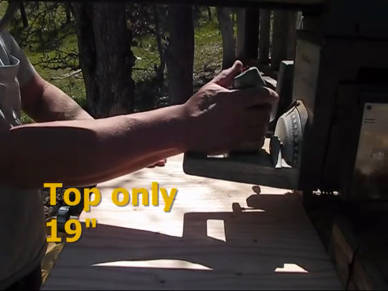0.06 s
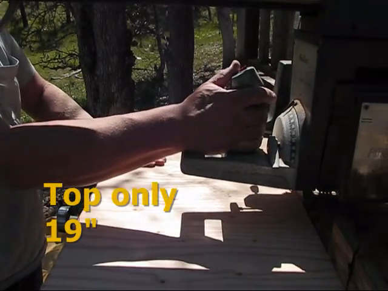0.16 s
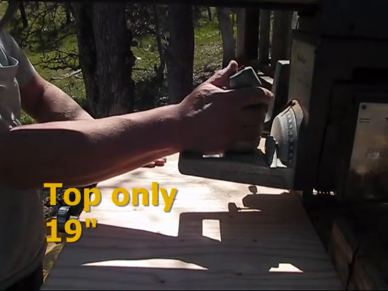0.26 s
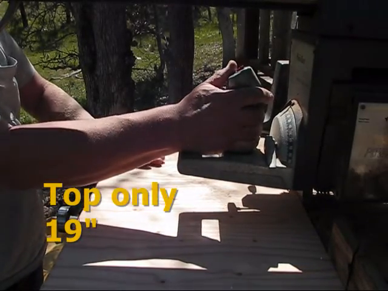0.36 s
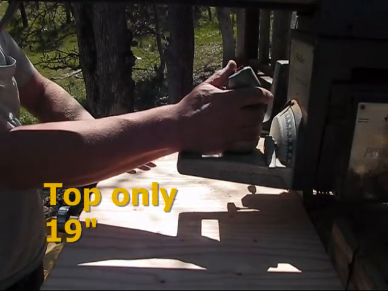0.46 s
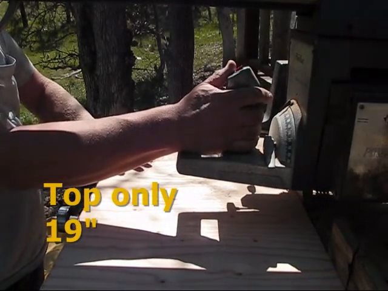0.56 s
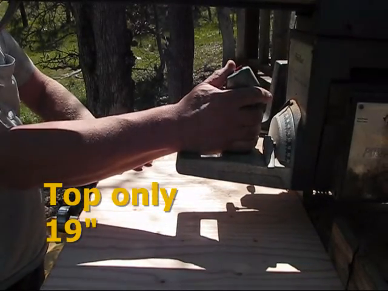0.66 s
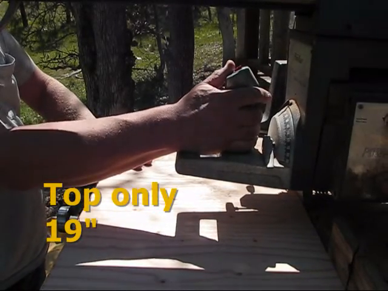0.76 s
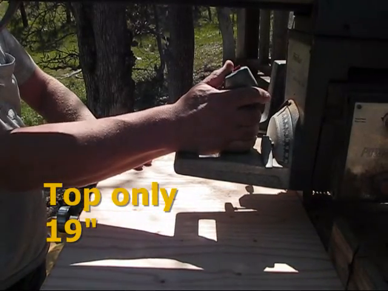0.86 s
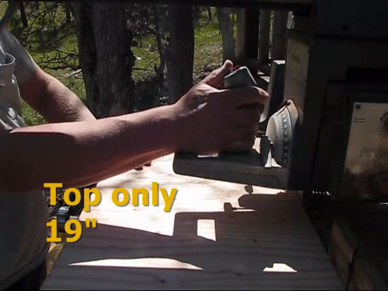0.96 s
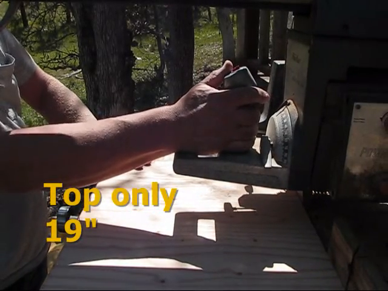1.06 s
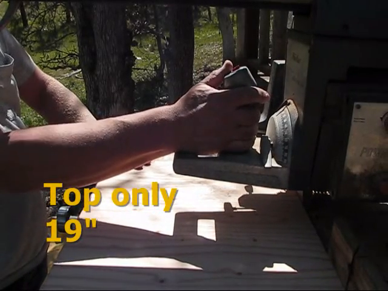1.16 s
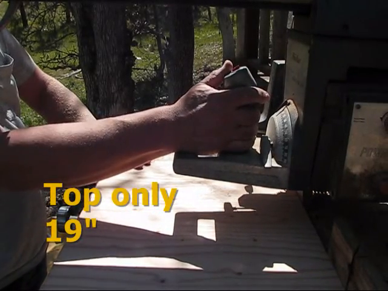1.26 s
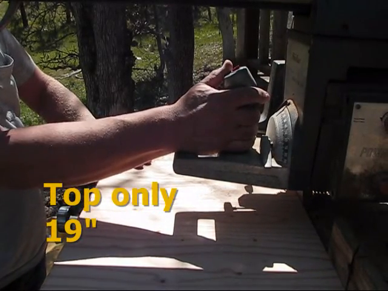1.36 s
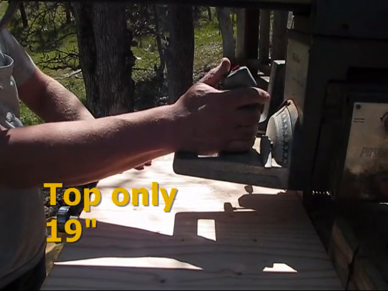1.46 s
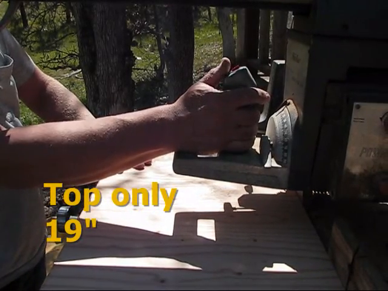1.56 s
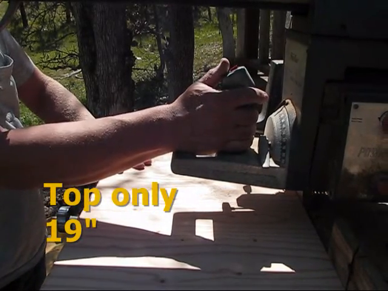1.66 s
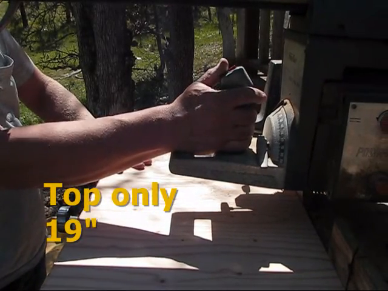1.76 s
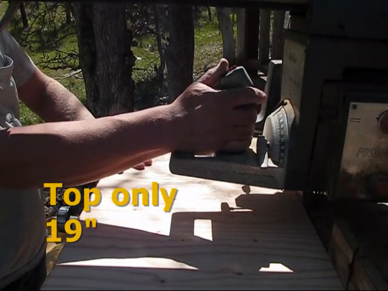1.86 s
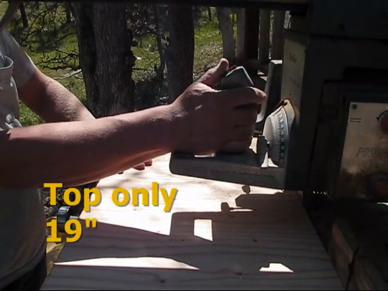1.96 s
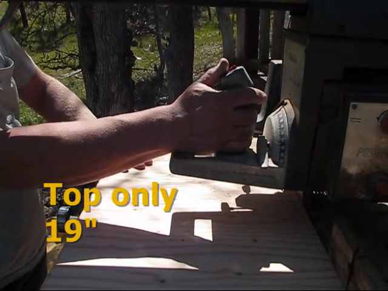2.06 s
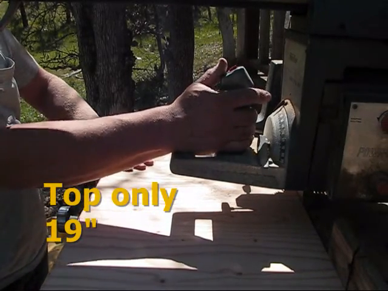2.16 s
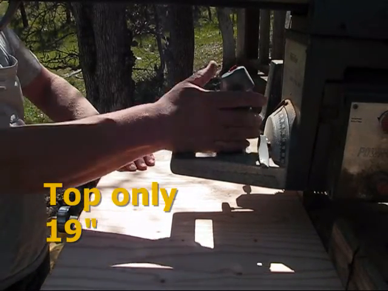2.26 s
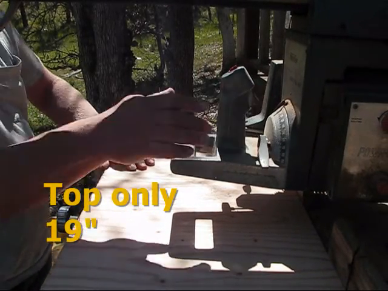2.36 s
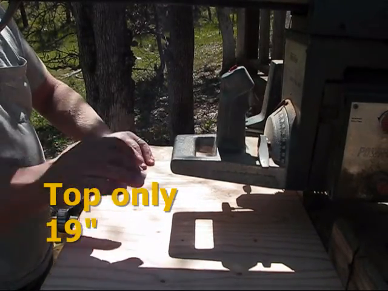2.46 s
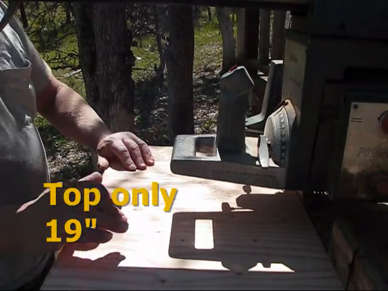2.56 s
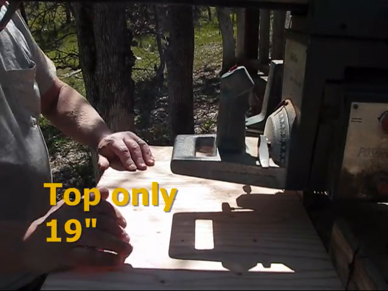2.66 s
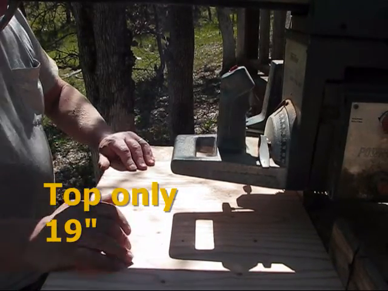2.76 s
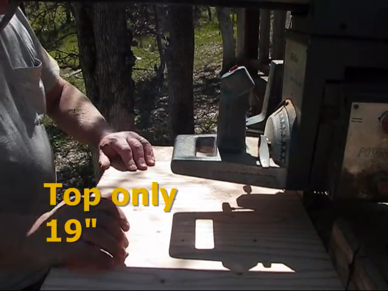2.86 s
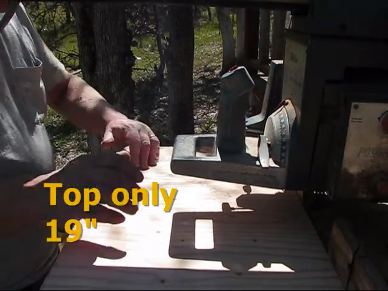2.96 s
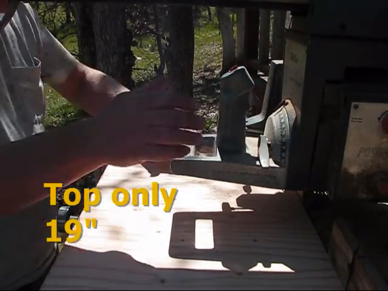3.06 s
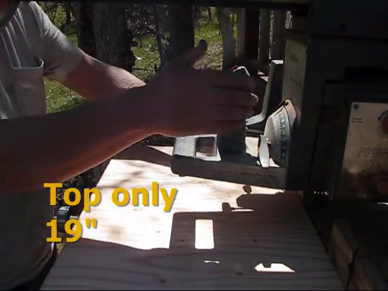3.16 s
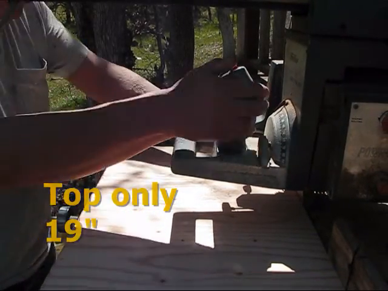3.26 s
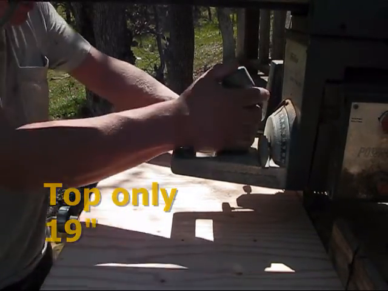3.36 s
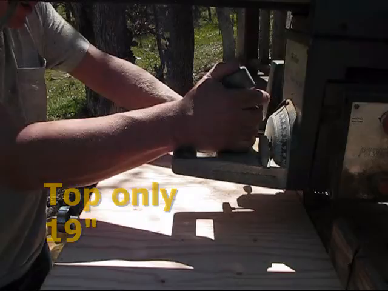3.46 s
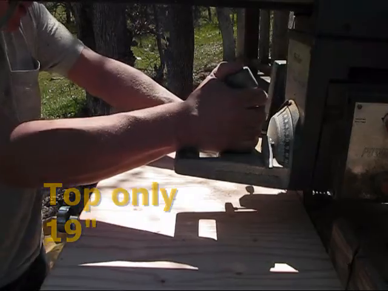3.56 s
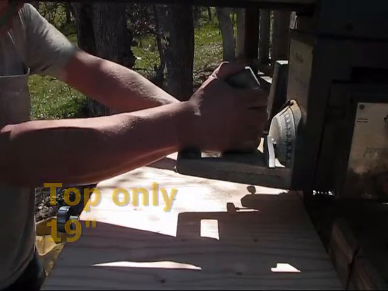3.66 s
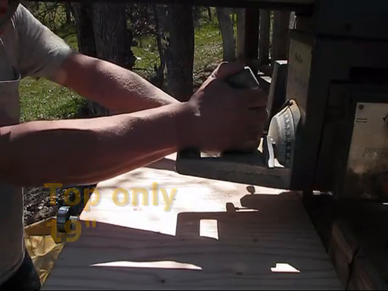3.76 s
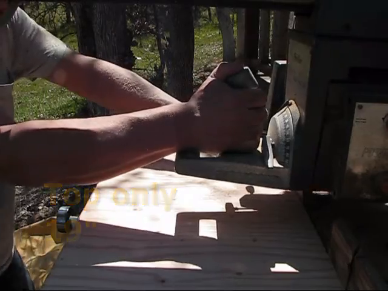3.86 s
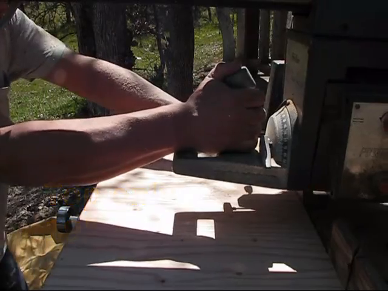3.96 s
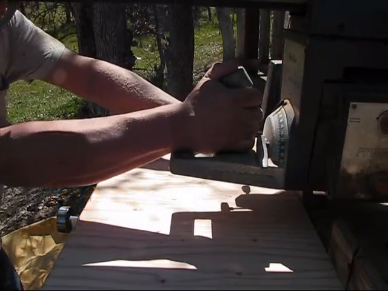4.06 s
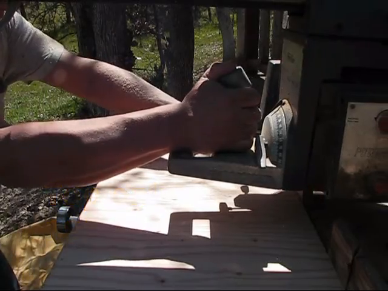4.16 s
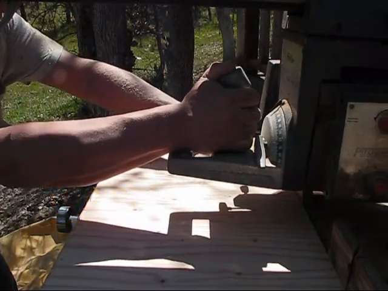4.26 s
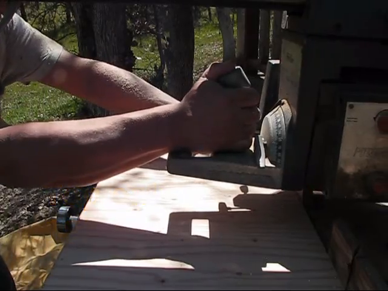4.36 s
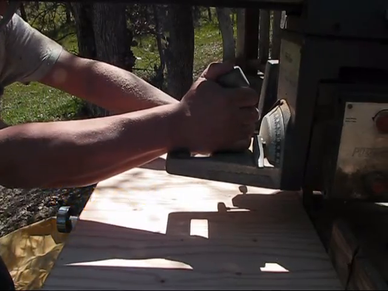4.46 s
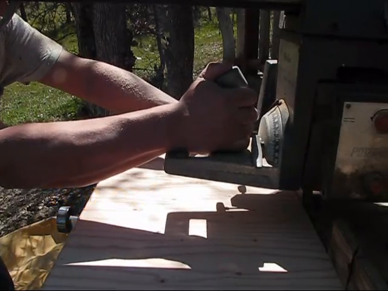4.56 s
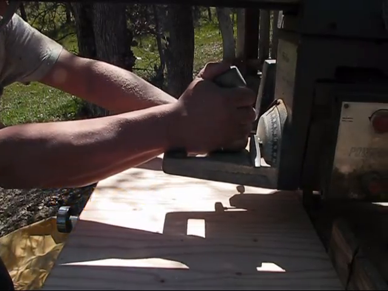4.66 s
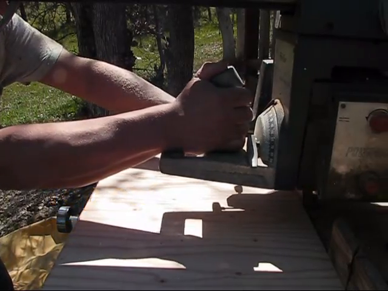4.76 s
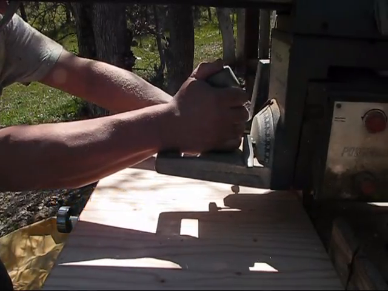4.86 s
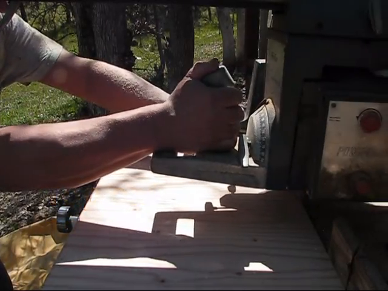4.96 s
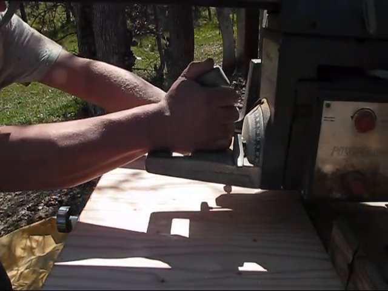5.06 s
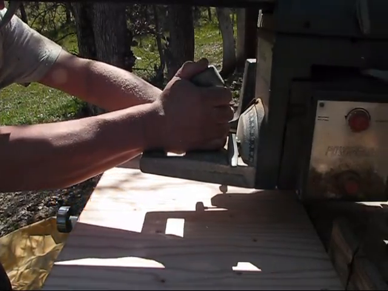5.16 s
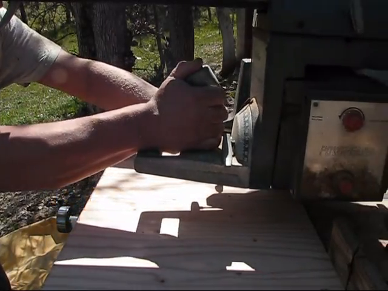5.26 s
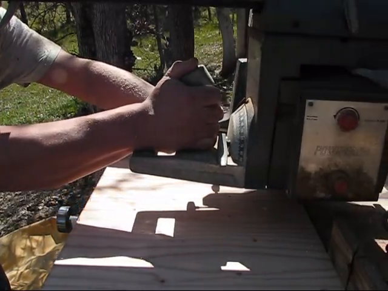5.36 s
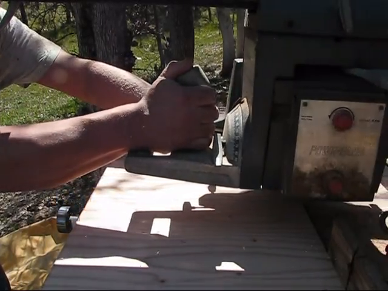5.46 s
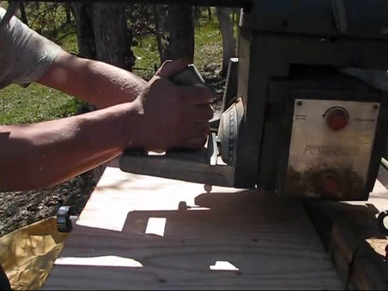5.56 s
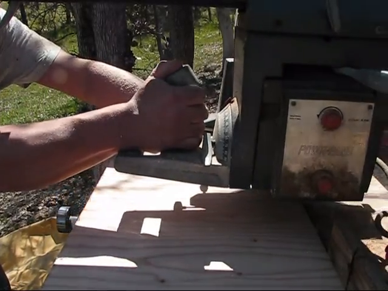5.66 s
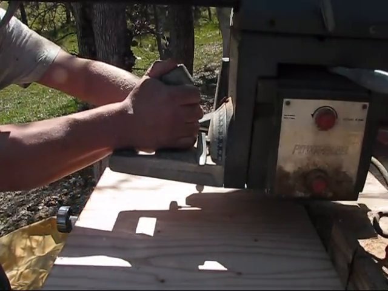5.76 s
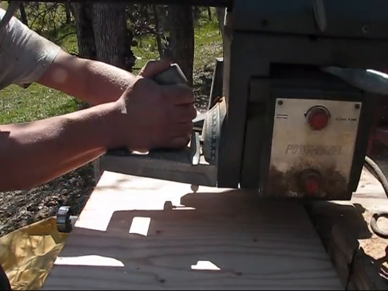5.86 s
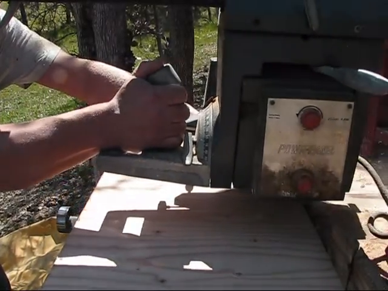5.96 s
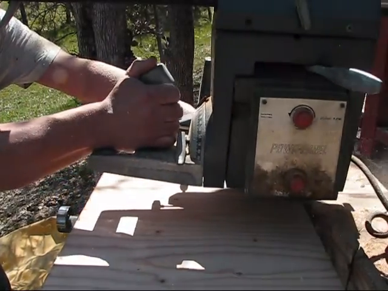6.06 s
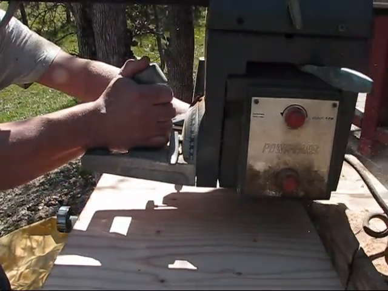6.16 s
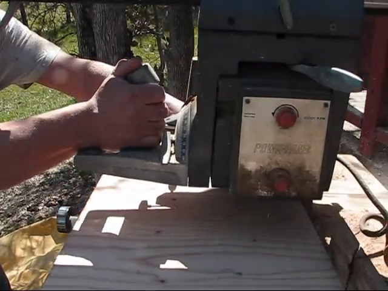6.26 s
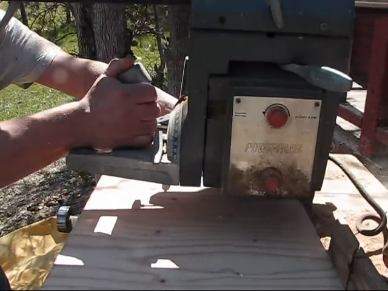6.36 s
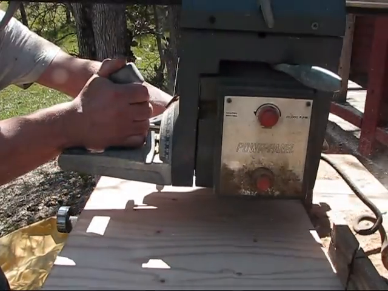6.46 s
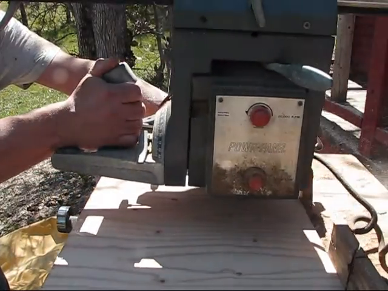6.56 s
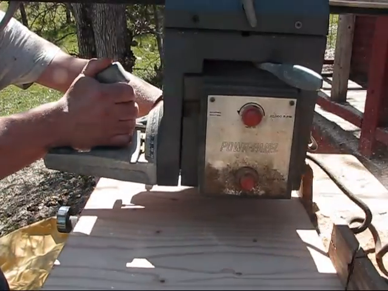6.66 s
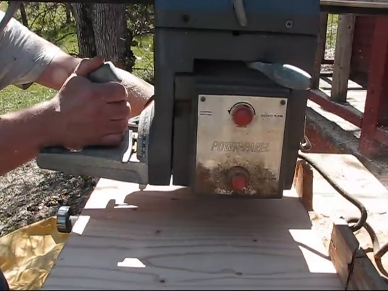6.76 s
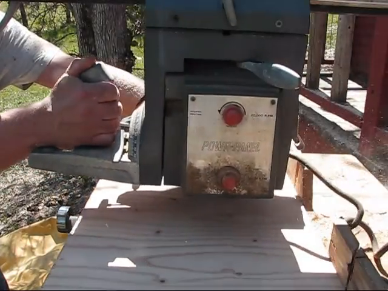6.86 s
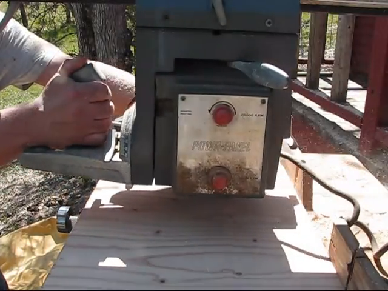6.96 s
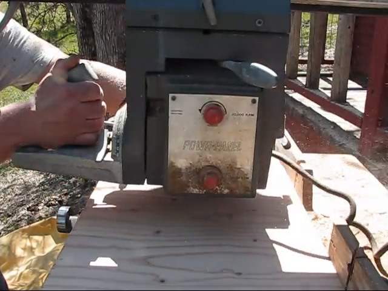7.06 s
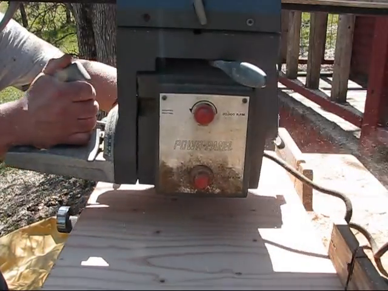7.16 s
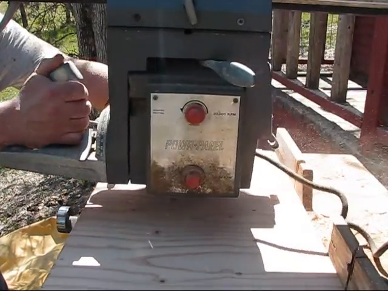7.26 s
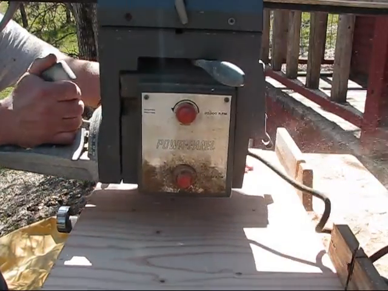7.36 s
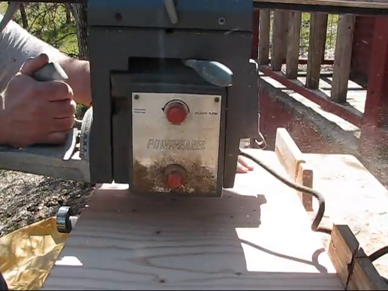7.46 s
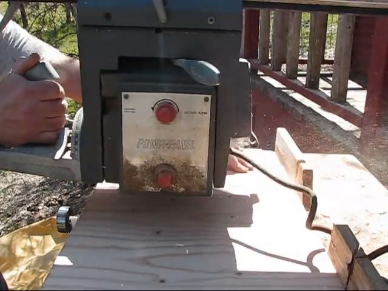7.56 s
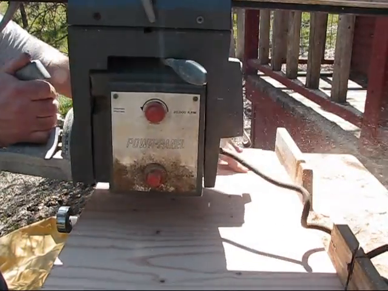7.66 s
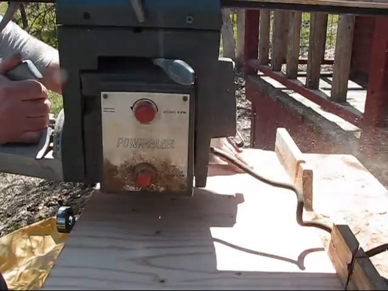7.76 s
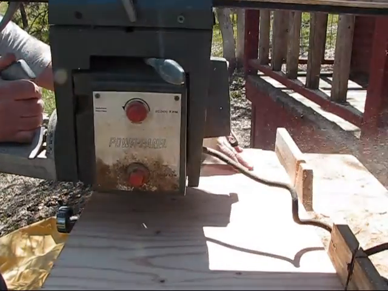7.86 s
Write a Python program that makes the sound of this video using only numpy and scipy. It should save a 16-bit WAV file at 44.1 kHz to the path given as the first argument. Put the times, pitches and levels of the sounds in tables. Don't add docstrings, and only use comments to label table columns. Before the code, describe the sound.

A close stereo microphone in a yard picks up a brief board slide, light knocks, skin rubbing, tiny squeaks and low wind buffets. Then a very loud clack and jolt; a saw motor clatters up with ringing guard pings and a rising whine. The blade grazes the wood, enters, and grinds steadily with hissing dust and wavering metallic singing, sagging slightly at the end.

```python
import sys
import numpy as np
from scipy import signal
from scipy.fft import rfft, irfft, next_fast_len
from scipy.io import wavfile
from scipy.ndimage import uniform_filter1d, map_coordinates

SR = 44100
rng = np.random.default_rng(int(sys.argv[2]) if len(sys.argv) > 2 else 0)


def put_to_file(sound):
    columns = np.atleast_2d(sound).T
    safe = np.clip(columns, -1, 1)
    whole_steps = np.round(safe * 32767)
    wavfile.write(sys.argv[1], SR, whole_steps.astype(np.int16))


def volts_from_db(level):
    exponent = np.asarray(level, float) / 20
    return 10 ** exponent


N = 348390
T = np.arange(N) / SR
COARSE_T = T[::64]
SIZE = next_fast_len(N + SR // 4)
HZ = np.arange(SIZE // 2 + 1) * SR / SIZE + 1e-3
TEETH = 20
START = round(3.82 * SR)
GUARD_HZ, GUARD_WIDTH_HZ = 2790, 60


def rms_one(x):
    return x / np.sqrt(np.mean(x ** 2) + 1e-20)


def in_time(rows):
    s, *columns = np.transpose(rows)
    return [np.interp(T, s, column) for column in columns]


def at_hz(points):
    hz, value = np.transpose(points)
    return np.interp(np.log(HZ), np.log(hz), value)


def through(x, response):
    return irfft(rfft(x, SIZE) * response, SIZE)[..., :N]


def drift(rate):
    knots = rng.standard_normal(800)
    curve = map_coordinates(knots, [COARSE_T * rate * 2], order=2)
    return rms_one(np.interp(T, COARSE_T, curve))


def swells(s, rise, fall, db):
    late = T[::64, None] - s
    length = np.where(late < 0, rise, fall)
    return np.interp(T, COARSE_T, volts_from_db(db - 12 * (late / length) ** 2).sum(axis=1))


def body(modes, spectrum, between_db):
    power = np.tile(volts_from_db(2 * (at_hz(spectrum) + between_db)), (2, 1))
    tilt_db = 1.5 * rng.standard_normal((len(modes), 2, 1))
    for (hz, width, db), tilt in zip(modes, tilt_db):
        detuning = (HZ / hz - hz / HZ) * hz / width
        power += volts_from_db(2 * (db + tilt)) / (1 + detuning ** 2) ** 1.5
    return np.sqrt(power)


def grains(per_s, spread_db):
    sizes = volts_from_db(spread_db * np.minimum(rng.exponential(1, (2, N)), 5)) * rng.standard_normal((2, N))
    return sizes * (rng.random((2, N)) < per_s / SR)


def coloured(pair, gain, likeness):
    mid, side = rfft(pair, SIZE)
    alike = np.clip(at_hz(likeness), 0, 1)
    ears = np.sqrt(1 + alike) * mid + np.sqrt(1 - alike) * side * [[1], [-1]]
    return rms_one(irfft(ears * gain, SIZE)[:, :N])


def panned(db):
    return volts_from_db(np.array([db / 2, -db / 2])).reshape(2, -1)


def two_pole(x, hz, width):
    r = np.exp(-np.pi * width / SR)
    return signal.lfilter([1, 0, -1], [1, -2 * r * np.cos(2 * np.pi * hz / SR), r * r], x)


def resonance(x, hz, width):
    return rms_one(two_pole(x + 1e-18, hz, width))


def burst(s, db, hz, width, t60):
    k = np.arange(9000)
    noise = rng.standard_normal((3, len(k))) * volts_from_db(-60 * k / SR / t60)
    noise[0, 0] += 3
    ring = two_pole(noise[0] + .5 * noise[1:], hz, width)
    out, at = np.zeros((2, N)), round(s * SR)
    out[:, at:at + len(k)] = volts_from_db(db) * ring / np.abs(ring).max()
    return out


# pitch_hz, level_db_per_hz
YARD_COLOUR = [(59, -19), (100, -0.5), (244, -1), (295, 0), (335, 0), (991, 2.5), (1610, -5.5), (2580, -14),
               (8110, -17), (12100, -19.5), (16000, -32)]
# pitch_hz, left_right_likeness
YARD_LIKENESS = [(60, 0.38), (180, 1), (550, 0.9), (1650, 0.66), (4970, 0.061), (15000, 0.03)]


def far_field():
    noise = coloured(rng.standard_normal((2, N)), volts_from_db(at_hz(YARD_COLOUR)), YARD_LIKENESS)
    return volts_from_db(-50 + 1.0 * drift(3.186)) * noise


# pitch_hz, level_db
HUM = [(96.9, -59), (290.7, -62), (7854, -75)]


def hum():
    return sum(volts_from_db(db - 1.0 + 0.51 * drift(5.0)) * np.sin(2 * np.pi * hz * T) for hz, db in HUM)


# peak_s, half_length_s, level_db
GUSTS = [(.75, 0.22, -54), (2.003, 0.12, -55), (2.353, 0.12, -52), (2.932, 0.11, -49.5), (3.6, 0.31, -57),
         (5.15, 0.27, -57), (6.12, 0.2, -58), (6.45, .15, -63), (6.8, .3, -70), (7.15, .25, -58),
         (7.846, 0.21, -54)]
# pitch_hz, level_db_per_hz
GUST_COLOUR = [(12, -35), (20, -2.5), (91, 1.5), (182, -8.5), (259, -38), (277, -11), (300, -7.5),
               (390, -54), (660, -120)]
# pitch_hz, left_right_likeness
NEAR_LIKENESS = [(60, 0.21), (180, 0.42), (550, 0.47), (1650, 0.64), (4970, 0.51), (15000, 0.045)]


def wind(ducked):
    s, half, db = np.transpose(GUSTS)
    blowing = ducked * volts_from_db(-61) + swells(s, half, half, db)
    return coloured(rng.standard_normal((2, N)), volts_from_db(at_hz(GUST_COLOUR)), NEAR_LIKENESS) * blowing


# start_s, level_db
STOP_TOUCHES = [(1.04, -60), (1.875, -56)]
# pitch_hz, level_db, t60_s
STOP_MODES = [(2840, -7, .9), (4264, 0, .9), (5430, -5, .5)]


def metal_stop():
    out = np.zeros(N)
    for s, db in STOP_TOUCHES:
        late = np.maximum(T - s, 0)
        for hz, own_db, t60 in STOP_MODES:
            out += volts_from_db(db + own_db - 60 * late / t60) * np.sin(2 * np.pi * hz * late)
    return out


# start_s, end_s, pitch_hz, level_db
SQUEAKS = [(1.1, 1.14, 2040, -53), (3.28, 3.295, 1750, -44), (3.308, 3.365, 2430, -43),
           (3.31, 3.36, 4250, -52), (3.415, 3.44, 1445, -39)]


def squeaks():
    out = np.zeros(N)
    for on, off, hz, db in SQUEAKS:
        edges = np.clip(np.minimum(T - on, off - T) / 0.0034, 0, 1)
        out += volts_from_db(db - 3.5 + 2 * drift(40)) * edges * np.sin(2 * np.pi * hz * T)
    return out


def yard():
    ducked = volts_from_db(np.interp(T, [3.82, 4.2], [0, -26]))
    return ducked * (far_field() + hum() + metal_stop() + squeaks()) + wind(ducked)


# peak_s, rise_s, fall_s, board_slide_db, skin_and_cloth_scuff_db
HANDS = [(.07, 0.24, 0.18, -29, -32.5), (.36, 0.12, 0.094, -43, -47.5), (.65, 0.069, 0.16, -57, -60),
         (.51, 0.028, 0.034, -64, -53), (.8, 0.032, 0.046, -59, -50), (.93, 0.056, 0.041, -52, -51),
         (1.05, 0.085, 0.072, -45, -48), (1.21, 0.065, 0.083, -56, -67), (1.55, 0.85, 0.15, -60, -83),
         (1.85, 0.11, 0.067, -40.5, -46), (2.16, 0.033, .06, -70, -48), (2.25, 0.046, 0.027, -63, -44.5),
         (2.4, 0.097, 0.063, -59, -47.5), (2.55, 0.08, 0.027, -75, -60), (2.8, .05, 0.062, -76, -49.5),
         (2.92, 0.033, 0.015, -66, -53), (3.03, 0.013, 0.02, -60, -39), (3.06, 0.016, 0.025, -64, -44),
         (3.093, 0.0076, 0.0088, -61, -37), (3.13, 0.019, .02, -65, -46),
         (3.153, 0.011, 0.0091, -48, -31.5), (3.315, 0.011, 0.056, -73, -45),
         (3.368, 0.011, 0.021, -42, -33), (3.45, 0.038, 0.075, -51, -40.5), (3.64, 0.042, 0.026, -43, -43),
         (3.71, 0.054, 0.074, -34.5, -41.5)]
# pitch_hz, level_db_per_hz
SLIDE = [(88, -57), (150, -18), (244, -19.5), (368, -8), (578, -7.5), (805, -4.5), (1060, -0.5),
         (1940, -10.5), (9440, -36), (16000, -60)]
# pitch_hz, width_hz, level_db
BOARD_MODES = [(834, 100, 0), (1070, 51, -2), (1580, 110, -3), (2180, 73, -8), (2820, 63, -9),
               (3430, 110, -12), (4600, 85, -12), (8110, 170, -17)]
# pitch_hz, level_db_per_hz
SCUFF = [(710, -44), (1200, -15), (1460, 7.5), (2000, 2), (2380, 5), (2620, 5.5), (10000, 2), (12300, 1),
         (16000, -20)]
# pitch_hz, width_hz, level_db
LOOSE_MODES = [(4570, 670, 3.5), (2870, 270, 1)]
# start_s, peak_db, pitch_hz, t60_s
KNOCKS = [(1.1947, -27.5, 4090, 0.018), (1.2025, -35, 1500, .03), (1.2365, -26, 4800, 0.024),
          (1.4257, -47, 4960, 0.02), (2.2257, -35, 2760, 0.02), (2.2694, -33, 3090, 0.022),
          (2.8225, -34, 3170, 0.03), (3.019, -36, 2800, 0.03), (3.157, -27, 4000, 0.02),
          (3.3615, -25, 4920, 0.02), (3.384, -33, 5000, .015), (3.442, -33, 4800, .04),
          (3.697, -27, 3500, .025), (3.7072, -15, 4500, 0.018)]


def hands():
    s, rise, fall, slide_db, scuff_db = np.transpose(HANDS)
    slide = coloured(grains(6000, spread_db=-1.5), body(BOARD_MODES, SLIDE, between_db=-1.5), YARD_LIKENESS)
    scuff = coloured(grains(20000, spread_db=1.5), body(LOOSE_MODES, SCUFF, between_db=0), NEAR_LIKENESS)
    sliding = volts_from_db(-48 - 5.2 * T) + swells(s, rise, fall, slide_db)
    scuffing = volts_from_db(-65.5) + swells(s, rise, fall, scuff_db)
    moving = sliding * volts_from_db(0.5 * drift(39)) * slide
    moving = moving + scuffing * volts_from_db(1.7 * drift(40)) * scuff * panned(-0.11)
    knocks = sum(burst(s + .0008, db, hz, width=.8 * hz, t60=t60) for s, db, hz, t60 in KNOCKS)
    return moving * (T < 3.825) + knocks * panned(-1.4)


# start_s, peak_db
SWITCH = [
    (3.8215, -9),
    (3.8232, -1),
    (3.8245, 1),
]


def switch_clack():
    return sum(burst(s, db, hz=5350, width=3700, t60=0.016) for s, db in SWITCH)


# pitch_hz, width_hz, peak_db, t60_s
JOLT = [(478, 7.1, -22, 0.63), (363, 7.5, -27.5, 0.77), (950, 400, -12, 1)]


def torque_jolt():
    return sum(burst(3.83, db, hz, width, t60) for hz, width, db, t60 in JOLT)


# pitch_hz, level_db_per_hz
RATTLE = [(59, -96), (100, -70), (181, -16), (684, -1), (827, -7), (1000, 5), (2380, 10.5), (2820, 9.5),
          (8630, -1.5), (12100, 0.5), (15600, -19)]
# pitch_hz, width_hz, level_db
FRAME_MODES = [(474, 24, -10), (619, 120, -10), (996, 44, -5), (1340, 31, -4), (1580, 44, -3),
               (1980, 200, -6), (2560, 66, -6), (2800, 100, -4), (3280, 120, -7), (3520, 78, -8),
               (4080, 55, -5), (5420, 140, -10), (6660, 140, -14), (7410, 30, -15)]


def frame_rattle(beat, slow, bite):
    frame = body(FRAME_MODES, RATTLE, between_db=-13)
    rattle = coloured(grains(9000, spread_db=1.2) * beat, frame, NEAR_LIKENESS)
    rattle_db = -23.5 + 10.5 * slow + 0.01 * bite
    return volts_from_db(rattle_db + 1.1 * drift(20)) * rattle


def tooth_loop(turns):
    multiple = np.arange(4097)
    heights = rng.rayleigh(1, 4097) * (multiple <= 17 * TEETH) * (multiple > 26)
    loop = irfft(heights * np.exp(2j * np.pi * rng.random(4097)))
    return rms_one(np.interp(turns % 1 * 8192, np.arange(8192), loop, period=8192))


# pitch_hz, width_hz, level_db
BLADE_MODES = [(985, 30, -6), (1350, 18, -10), (2570, 22, -8), (2785, 75, -9), (3081, 12, -10),
               (3192, 20, -5), (3480, 35, -9), (3732, 16, -2), (3840, 11, -2), (4110, 18, -6),
               (4250, 18, -7), (4467, 11, 1), (4588, 18, 1), (4887, 12, -2), (5081, 28, -1), (5339, 20, -3),
               (5401, 11, -3), (5810, 28, -6), (5950, 12, -5), (6454, 30, -3), (6650, 28, -4),
               (7021, 18, -4), (7311, 18, -3), (7710, 30, -9), (8040, 22, -8), (8510, 26, -9)]
# pitch_hz, level_db_per_hz
CHIPS = [(59, -57), (100, -16.5), (793, -2), (959, 4), (1160, 2), (1970, -5), (3710, -1), (4040, -1.5),
         (4580, 1), (12900, -6), (15600, -21)]


def tooth_strikes_and_chips(turns, beat, bite_db, bite):
    blade = body(BLADE_MODES, CHIPS, between_db=-18.5)
    strikes = rms_one(through(tooth_loop(turns) * volts_from_db(1.5 * drift(30)), blade))
    chips = coloured(grains(30000, spread_db=1.0) * beat, blade, NEAR_LIKENESS)
    return volts_from_db(-19.5 + .7 * bite) * strikes + volts_from_db(bite_db - 4.5 + 1.3 * drift(10)) * chips


# pitch_hz, level_db_per_hz
HISS = [(2940, -55), (5000, 4.5), (5220, 1.5), (7060, 7.5), (8270, 1), (10300, 4.5), (13000, 2.5),
        (15700, -5)]


def air_hiss(turns, beat, slow):
    colour = volts_from_db(at_hz(HISS))
    hiss = coloured(rng.standard_normal((2, N)) * beat, colour, NEAR_LIKENESS)
    siren = rms_one(through(tooth_loop(turns), colour))
    level_db = -18.5 - 54 * slow
    level_db += 3 * np.exp(-((T - 5.2) / 0.38) ** 2)
    level_db += 3 * (T > 4.66) * np.exp(-((T - 4.66) / .15) ** 2)
    return volts_from_db(level_db - 4.5 + 1.0 * drift(12)) * (hiss + volts_from_db(-2) * siren)


SHAFT_CYCLES = [13, 18, 54, 20, 21, 22, 23]
SHAFT_DB = [-6, -11, -10, -0.5, -18, -6, -10]
SHAFT_FOLLOWS = [-0.15, -0.87, -0.2, -0.21, -0.54, 1, 0.63]
OVERTONES_DB = [-5, -15, -4, 2, 1, 1, 0, -8, -1, -3, 0, -2, -6, -7, -11]
# pitch_hz, width_hz, tone_db
GUARD_MODES = [(472, 28, -42), (597, 57, -37), (730, 52, -29), (810, 33, -31.5), (895, 33, -30),
               (927, 12, -30), (986, 9.4, -24), (1400, 59, -23), (1799, 49, -25), (1978, 78, -26.5)]
# peak_s, half_length_s, multiple_of_tooth_rate, level_db
SINGING = [(5.72, 0.3, 3, -26), (6.1, 0.2, 3, -26), (6.38, 0.14, 3, -24), (6.9, 0.21, 3, -30),
           (6.06, 0.32, 4, -27), (7.66, 0.26, 4, -24), (5.16, 0.12, 5, -24), (5.66, 0.29, 5, -29),
           (6.38, 0.14, 5, -20), (7.24, 0.26, 5, -21), (5.22, 0.1, 6, -25), (6.55, 0.11, 6, -29),
           (7.13, 0.1, 6, -21), (7.46, 0.14, 6, -24), (4.91, 0.06, 7, -25), (5.28, 0.2, 7, -26),
           (5.66, 0.16, 7, -21), (6.08, 0.15, 7, -23), (6.57, 0.13, 7, -27), (7.23, 0.13, 7, -25),
           (5.46, 0.1, 8, -20), (6.1, 0.16, 8, -29), (6.43, 0.11, 8, -29), (7.22, 0.29, 8, -31),
           (7.3, 0.16, 8, -30), (6.02, 0.26, 9, -30), (4.895, 0.06, 10, -25), (5.41, 0.19, 10, -27),
           (6.03, 0.11, 10, -27), (6.26, 0.1, 10, -25), (6.52, 0.23, 10, -26), (7.51, 0.1, 10, -28),
           (4.74, 0.07, 11, -30), (5.14, 0.22, 11, -27), (5.96, 0.14, 11, -29), (6.79, 0.14, 11, -29),
           (4.72, 0.06, 12, -24), (5.01, 0.11, 12, -23), (5.92, 0.18, 12, -22), (6.36, 0.12, 12, -31),
           (7.52, 0.17, 12, -26), (4.86, 0.1, 13, -29), (5.3, 0.3, 13, -26), (5.93, 0.16, 13, -28),
           (7.12, 0.14, 13, -33), (5.04, 0.14, 14, -32), (5.41, 0.16, 14, -30), (4.63, 0.06, 15, -32),
           (4.885, 0.06, 15, -21), (4.9, 0.07, 16, -30),
           (6.85, .4, 2, -33), (5.06, .07, 6, -24), (4.74, .05, 14, -29), (6.25, .35, 1, -26.5),
           (5.9, .3, 1, -30), (7.05, .3, 1, -33), (7.5, .15, 1, -34), (6.66, .2, 5, -23),
           (7.8, .15, 5, -26), (7.84, .12, 8, -27), (7.82, .14, 10, -25), (7.72, .15, 9, -31),
           (7.75, .15, 6, -31), (5.85, .2, 5, -27), (4.35, .12, 3, -35), (6.9, .2, 5, -29),
           (6.75, .3, 13, -34), (7.35, .1, 15, -33), (5.6, .25, 12, -32)]


def blade_tones(turns, turns_per_s, bite):
    blade = [(hz, 2.3 * width, db - 31.0) for hz, width, db in BLADE_MODES[2:]]
    hz, width, db = np.transpose(GUARD_MODES + blade)
    songs = np.array(SINGING)
    out = np.zeros((2, N))
    whine = volts_from_db(-32.5 - 5 * np.clip((COARSE_T - 5.4) / .5, 0, 1))
    woken = (COARSE_T - 4.6) / .15
    choke_db = -12 * np.clip((COARSE_T - 7.5) / .2, 0, 1)
    orders = [*SHAFT_CYCLES, *TEETH * np.arange(2, 17)]
    for cycles, own_db, follows in zip(orders, SHAFT_DB + OVERTONES_DB, SHAFT_FOLLOWS + [0] * 15):
        overtone = cycles > 2 * TEETH and not follows
        off = (cycles * turns_per_s[::64, None] - hz) / width
        crossing = (volts_from_db(db) / (1 + off ** 2) ** 1.3).max(axis=1)
        steady = overtone * (whine if cycles > 8 * TEETH else volts_from_db(-38))
        level = volts_from_db(own_db + follows * bite[::64]) * np.maximum(steady, crossing)
        if cycles not in (18, 54):
            level *= np.clip(woken, 0, 1)
        if cycles in (13, 18, 20, 21, 22):
            level *= volts_from_db(choke_db)
        s, half, multiple, song_db = songs[np.round(songs[:, 2]) * TEETH == cycles].T
        song_db = song_db + 1.5 - 13 * (multiple == 3) + 1.5 * (multiple > 8)
        song = volts_from_db(song_db - 12 * ((COARSE_T[:, None] - s) / half) ** 2).sum(axis=1)
        level = np.interp(T, COARSE_T, np.maximum(level, song))
        level *= volts_from_db((2.0 * overtone - 0.5) * drift(22))
        level *= 1 + overtone * .65 * np.sin(2 * np.pi * (turns + rng.random()))
        lag = rng.normal(0, .28, (2, 1)) * np.sqrt(cycles / 100)
        out[:, START:] += level[START:] * np.sin(2 * np.pi * cycles * turns[START:] + lag)
    return np.sqrt(2) * out


# time_s, level_db
KNOCKING = [(3.83, -36), (4.7, -37), (5.4, -35), (5.72, -29), (5.9, -33), (6.1, -25.5), (6.25, -31),
            (6.42, -25), (6.7, -33), (6.9, -27.5), (7.2, -33), (7.3, -30), (7.84, -40), (7.9, -22)]


def guard_knocks(turns):
    turned = np.diff(turns % 1, prepend=0) < 0
    impulses = turned * volts_from_db(4 * rng.standard_normal(N))
    blows = np.convolve(impulses, np.hanning(260))[:N] * rng.standard_normal(N)
    knocks = np.zeros(N)
    knocks[START:] = resonance(blows[START:], GUARD_HZ, GUARD_WIDTH_HZ)
    return volts_from_db(*in_time(KNOCKING)) * knocks


# peak_s, half_length_s, pitch_hz, level_db
FLARES = [(5.25, .25, 990, -33), (5.9, .3, 980, -31), (7.75, .2, 1000, -28), (7.25, .25, 1070, -31),
          (4.17, .15, 1000, -34), (4.2, .08, 1570, -32), (4.57, .08, 2040, -30), (7.35, .17, 985, -25),
          (6.7, .3, 995, -28), (3.95, .3, 1580, -32), (3.93, .2, 1300, -31), (4.39, .1, 1950, -28),
          (6.8, .5, 2570, -36), (6.7, .25, 3081, -31), (7.8, .15, 3081, -29), (6.65, .35, 3192, -30),
          (7.8, .25, 3192, -21), (7.5, .2, 3192, -29), (6.1, .3, 3192, -32), (6.55, .5, 3732, -27),
          (7.62, .35, 3732, -20.5), (6.6, .4, 3840, -24), (7.3, .15, 3840, -29), (7.7, .2, 3840, -30),
          (6.0, .3, 3840, -29), (4.05, .3, 4090, -32), (4.56, .12, 4090, -28), (5.3, .15, 4090, -38),
          (6.35, .2, 4467, -27), (7.0, .4, 4467, -26.5), (6.0, .3, 4588, -27), (6.6, .45, 4588, -24),
          (7.6, .15, 4588, -28), (6.85, .3, 4887, -30), (7.3, .25, 5081, -25), (7.8, .25, 5081, -25),
          (5.4, .35, 5339, -33), (7.75, .25, 5810, -26), (5.6, .25, 6650, -28), (6.2, .2, 6650, -29),
          (6.6, .2, 6800, -31), (5.45, .25, 7021, -31)]


def mode_flares():
    out = np.zeros(N)
    white = rng.standard_normal(N)
    for s, half, hz, db in FLARES:
        a, b = max(START, round((s - 2 * half) * SR)), round((s + 2 * half) * SR)
        envelope = volts_from_db(db - 12 * ((T[a:b] - s) / half) ** 2)
        out[a:b] += envelope * resonance(white[a:b], hz, width=14)
    return out


# time_s, teeth_per_s
SPIN = [(3.82, 330.0), (4.0, 450.4), (4.2, 590.4), (4.4, 712.6), (4.5, 765.0), (4.6, 801.0), (4.8, 851.8),
        (5.0, 884.4), (5.2, 900.0), (5.6, 921.8), (5.9, 932.8), (6.2, 930.4), (6.4, 920.0), (6.6, 908.0),
        (7.0, 905.4), (7.4, 888.9), (7.6, 877.1), (7.9, 843.1)]
# time_s, level_db
LOAD = [(3.83, -37), (4.2, -29.5), (4.5, -28), (4.9, -23), (5.3, -16.5), (5.7, -16), (6.2, -11.5),
        (6.35, -12), (6.6, -10.5), (6.95, -11), (7.4, -10), (7.5, -12), (7.65, -10), (7.9, -9.5)]
# time_s, left_minus_right_db
SAW_PAN = [(3.83, -2), (4.7, -2), (5.18, 1.5), (5.44, 0), (5.59, -0.5), (6.58, 1), (6.95, 0), (7.69, 0),
           (7.9, 0)]


def saw():
    bite_db, = in_time(LOAD)
    bite = bite_db + 15
    per_s = uniform_filter1d(in_time(SPIN)[0], size=5000)
    slow = 1 - per_s / 930
    turns = np.cumsum(per_s * (1 + .001 * drift(40))) / SR / TEETH
    graze = np.exp(-2.5 * ((turns - turns[round(4.4545 * SR)]) % 1))
    touch = 0.8 * np.exp(-((T - 4.55) / 0.16) ** 2)
    beat = 1 + 0.2 * np.sin(2 * np.pi * turns) + touch * (graze / graze.mean() - 1)
    sound = frame_rattle(beat, slow, bite) + tooth_strikes_and_chips(turns, beat, bite_db, bite)
    sound = sound + air_hiss(turns, beat, slow) + blade_tones(turns, per_s / TEETH, bite)
    sound = sound + guard_knocks(turns) + mode_flares()
    powered = np.clip((T - 3.824) / 0.0085, 0, 1)
    return powered * volts_from_db(1.0) * sound * panned(*in_time(SAW_PAN))


# start_s, peak_db
PINGS = [(3.851, -12.5), (3.886, -7), (3.91, -15), (3.928, -12), (3.949, -10), (3.996, -7), (4.041, -11),
         (4.112, -6), (4.124, -14), (4.199, -24), (4.232, -15), (4.253, -11), (4.506, -11), (4.532, -12),
         (4.556, -22), (4.584, -23), (4.714, -14)]


def guard_pings():
    return sum(burst(s, db, GUARD_HZ, 2 * GUARD_WIDTH_HZ, t60=.09) for s, db in PINGS)


def scene():
    return yard() + hands() + switch_clack() + torque_jolt() + saw() + guard_pings()


def top_cut(x):
    return signal.sosfilt(signal.butter(12, 16520, fs=SR, output="sos"), x)


# pitch_hz, left_minus_right_db
PORT_BALANCE = [(250, -0.5), (500, 0.5), (1000, 0.5), (2000, -2), (4000, -3), (8000, -1.5), (13000, -5.5)]
# pitch_hz, left_lead_radians
PORT_PHASE = [(0, 0), (1550, 0.00036), (9130, 1.35), (10600, 0.9), (10900, 2.7), (11800, -1.9),
              (16100, 3.1)]


def record(dry):
    ports = volts_from_db(at_hz(PORT_BALANCE) * [[.5], [-.5]]) * np.exp(at_hz(PORT_PHASE) * [[.5j], [-.5j]])
    band = HZ < 15850
    microphone = volts_from_db(5 * np.clip(HZ / 2500 - 5.2, 0, 1)) * band
    heard = through(dry, ports * microphone)
    held = np.where(T > 3.84, (1 + np.abs(heard / .66) ** 3) ** (-1 / 3), 1)
    rounded = heard + through((held - 1) * heard, band / (1 + (500 / HZ) ** 4))
    return top_cut(np.clip(rounded, -1, 1))


dry = scene()
out = record(dry)
put_to_file(out)
```